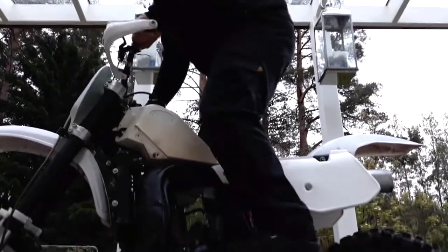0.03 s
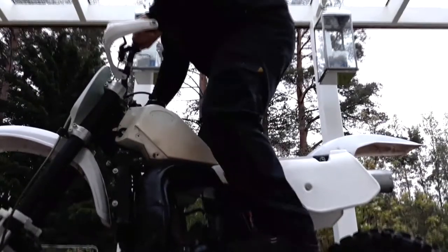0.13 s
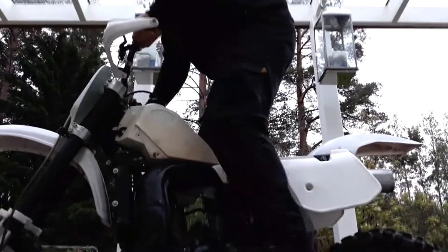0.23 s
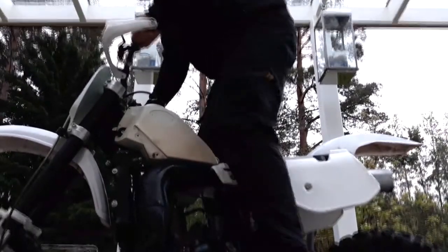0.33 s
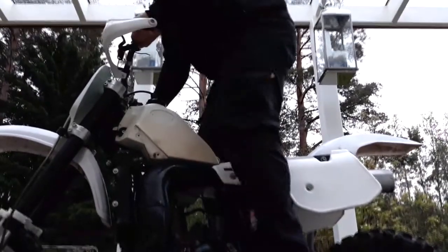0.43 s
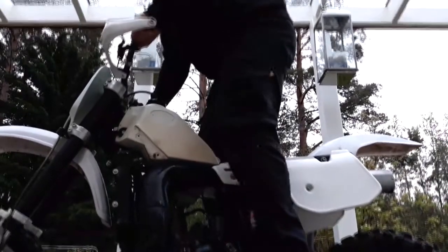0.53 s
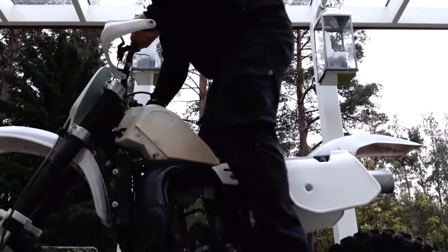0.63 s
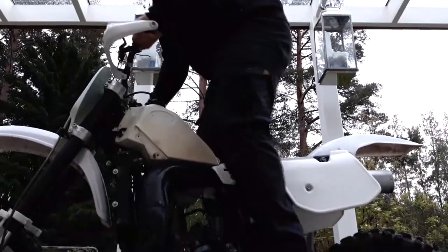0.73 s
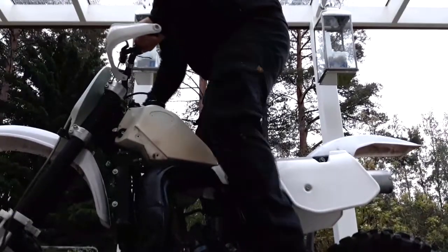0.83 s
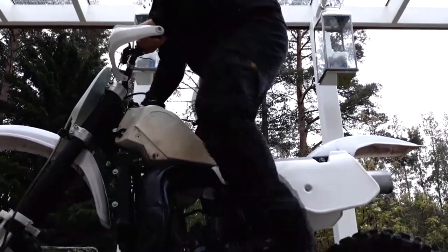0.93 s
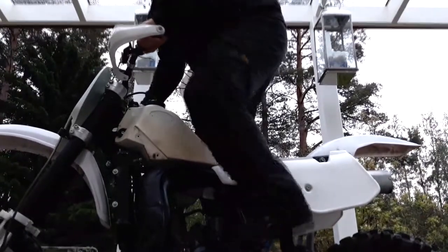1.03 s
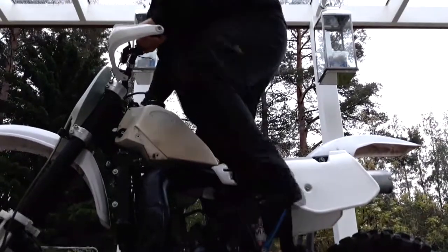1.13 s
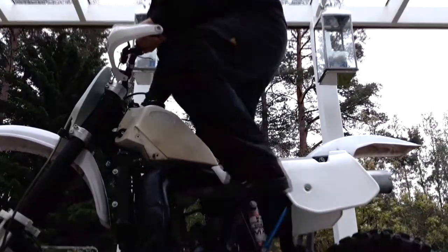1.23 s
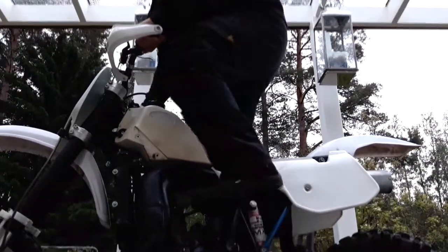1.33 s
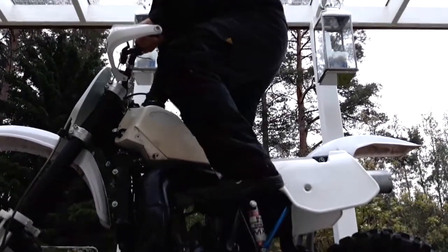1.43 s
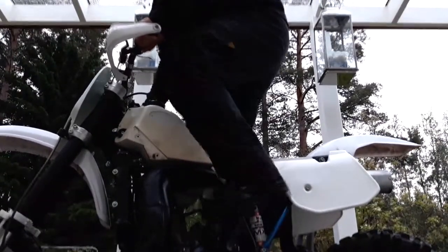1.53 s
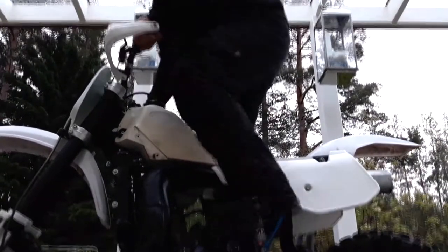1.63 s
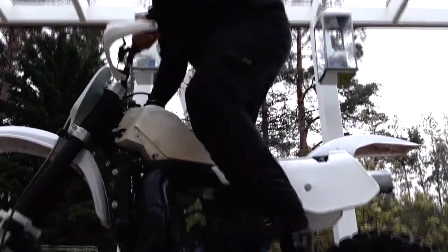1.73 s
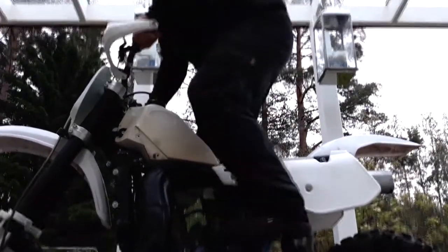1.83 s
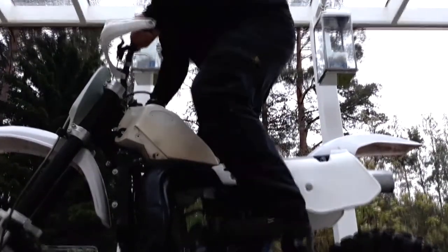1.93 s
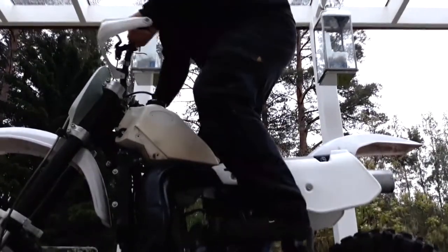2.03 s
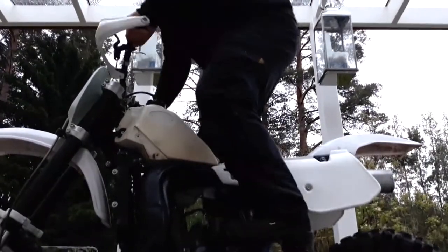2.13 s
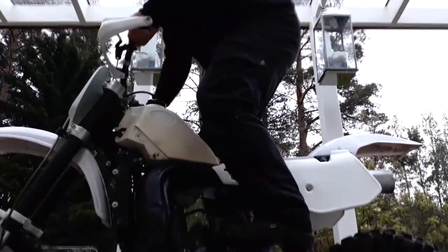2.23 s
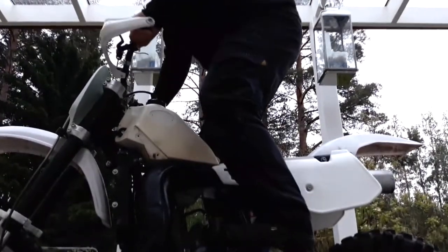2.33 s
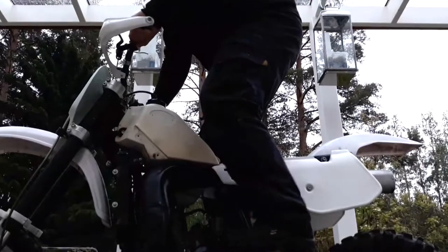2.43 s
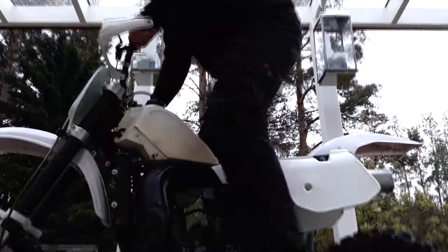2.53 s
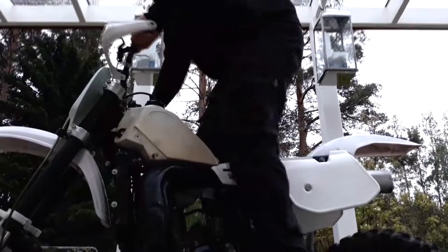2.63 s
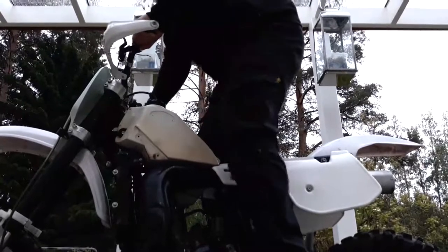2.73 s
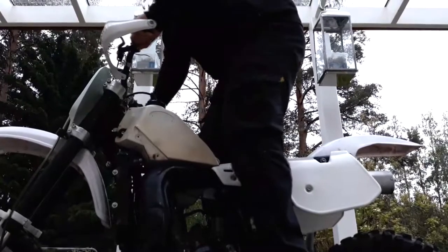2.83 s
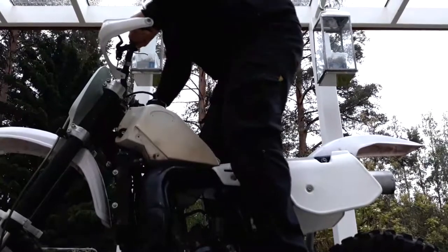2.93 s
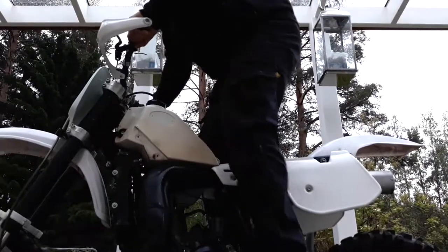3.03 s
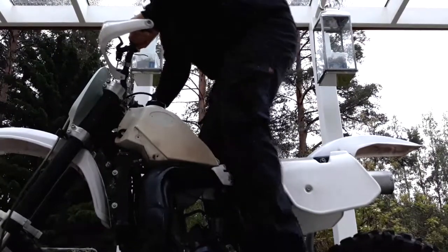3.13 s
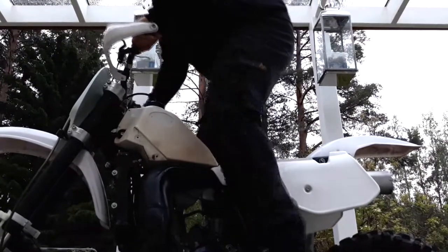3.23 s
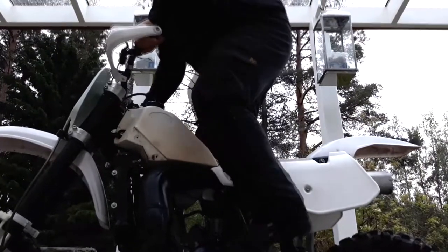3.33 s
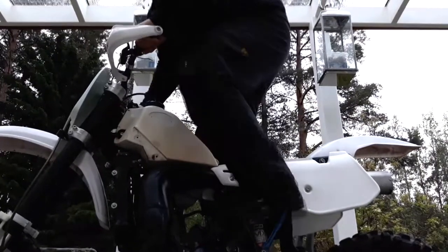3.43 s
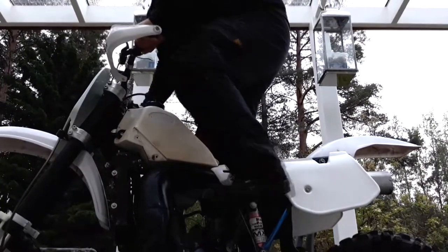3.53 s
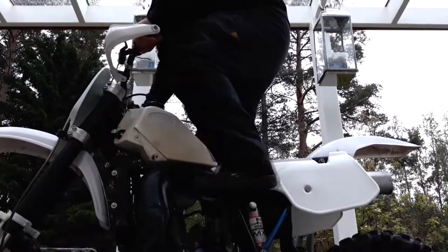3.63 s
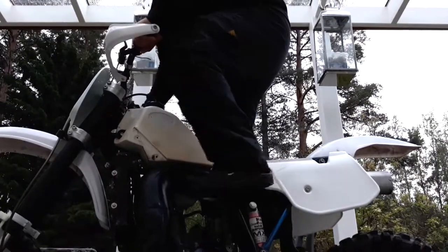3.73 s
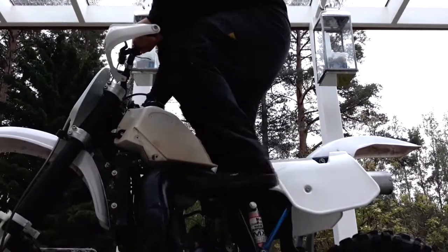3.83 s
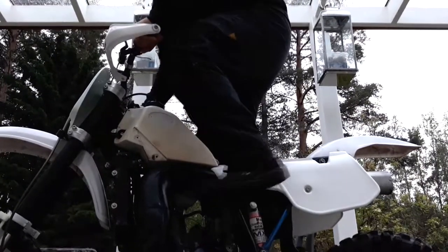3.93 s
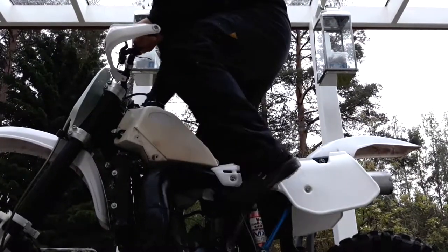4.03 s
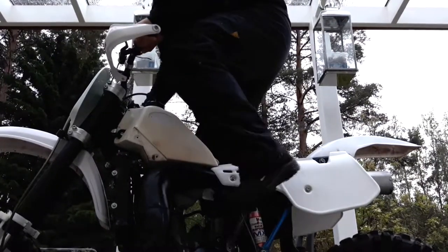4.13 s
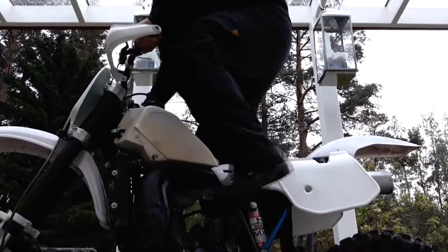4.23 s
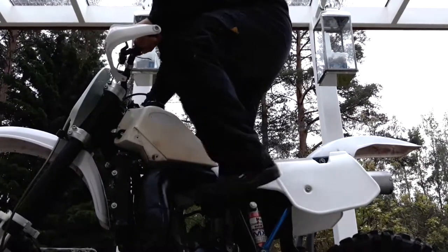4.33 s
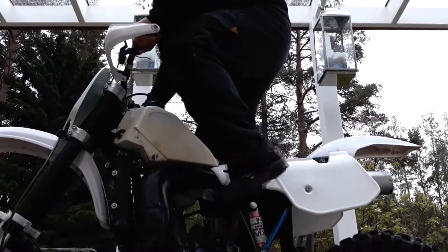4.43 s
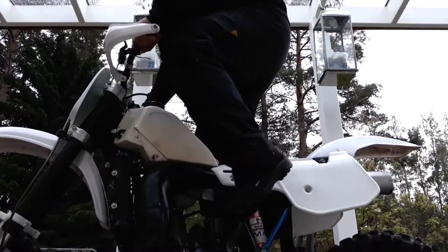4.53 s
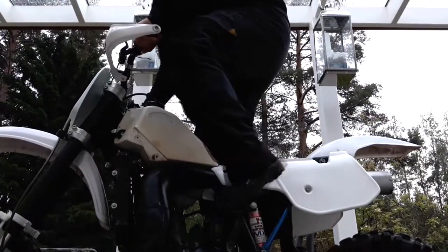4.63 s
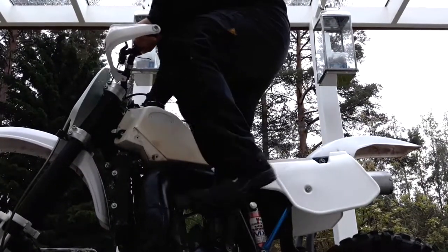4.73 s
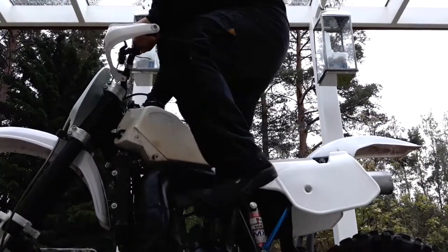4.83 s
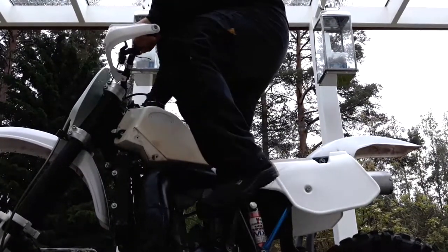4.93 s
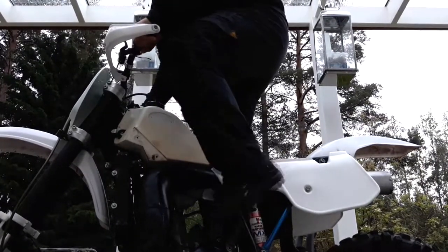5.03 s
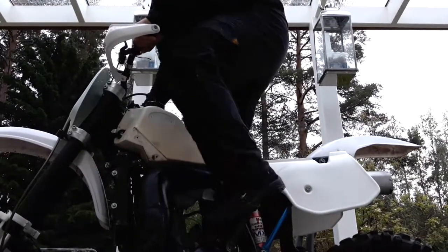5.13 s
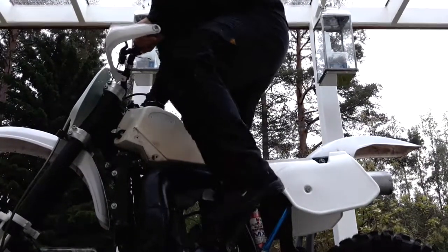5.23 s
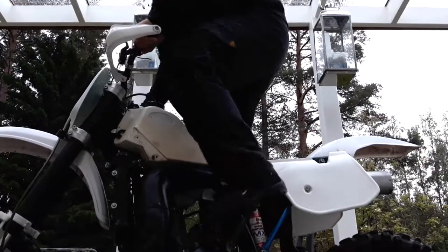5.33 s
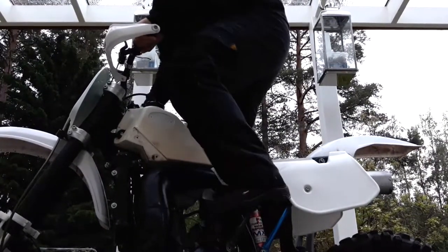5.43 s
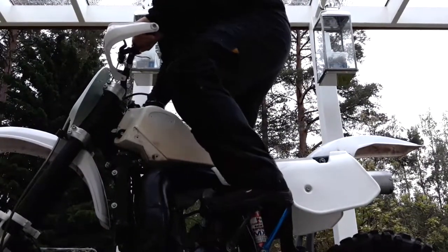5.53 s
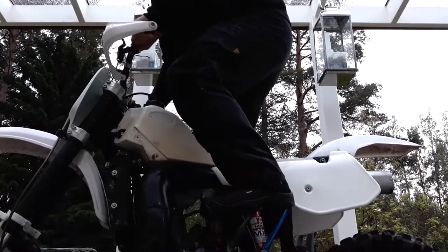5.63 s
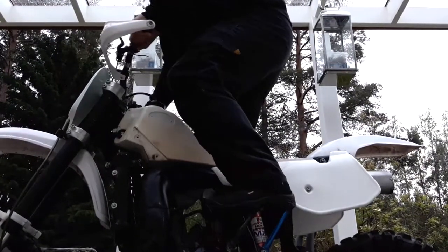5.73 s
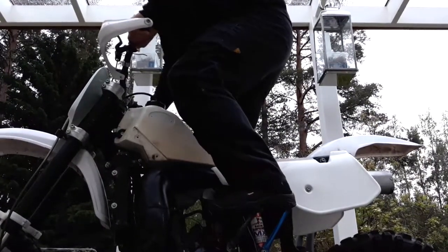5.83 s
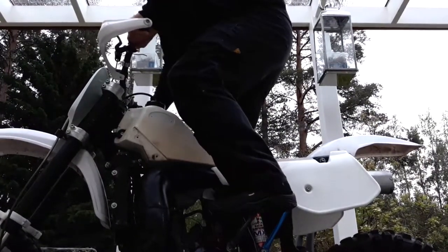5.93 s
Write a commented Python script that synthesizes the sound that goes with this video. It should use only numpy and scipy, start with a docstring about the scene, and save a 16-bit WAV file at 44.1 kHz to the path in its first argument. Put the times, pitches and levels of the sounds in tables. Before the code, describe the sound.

Motorbike kick-start attempts heard close up in a small covered outdoor space with short reflections. Two forceful strokes, with a feeble one between, combine low pipe thumps, grainy gear grinding and breathy hiss. Bright ratchet clacks ring after them, dull rubbery knocks fill gaps, and faint traffic, trees and clothing rustle sit behind.

```python
"""Kick-starting a motorbike under a porch

A rider kicks over a cold single-cylinder motorbike under a porch roof, heard at one microphone. The piston chuffs
through the pipe as ringing notes and turbulence, gears grind as grainy noise, air hisses out of the cylinder through
a narrow path. The starter ratchet clacks in steel resonances as the lever returns, and the lever knocks dully on its
stop. Roof and walls answer; far traffic, trees and boots stay faint behind."""
import sys
import numpy as np
from scipy import signal
from scipy.fft import rfft, irfft, next_fast_len
from scipy.io import wavfile
from scipy.ndimage import uniform_filter1d, map_coordinates

SR = 44100
rng = np.random.default_rng(int(sys.argv[2]) if len(sys.argv) > 2 else 0)


def bounce(signal):
    """Save signal as a 16-bit WAV file at the path given by the first command-line argument."""
    frames = np.transpose(np.atleast_2d(signal))
    limited = np.clip(frames, -1, 1)
    pcm = np.round(limited * 32767).astype(np.int16)
    wavfile.write(sys.argv[1], SR, pcm)


def linear_from_db(decibels):
    """Turn decibels (scalar or array-like) into linear amplitude factors; 0 gives 1."""
    return 10 ** (np.asarray(decibels, float) / 20)


N = 263277
T = np.arange(SR * 2 // 5) / SR  # time within one short sound, s

# Far rumble and near rustle, apart from the shudder: [t/s, rumble level/dB, rustle level/dB]
BACKGROUND_LEVELS = [(0, -48.5, -52.5), (.2, -53.5, -55), (.95, -61, -60.5), (1.2, -61.5, -62),
                     (1.45, -68, -66.5), (1.95, -59.5, -74.5), (2.25, -66.5, -70), (2.45, -59.5, -65),
                     (3.1, -58, -60.5), (3.55, -54.5, -52), (3.7, -53.5, -61.5), (3.85, -65.5, -68),
                     (4.15, -55, -55), (4.35, -51.5, -61), (4.6, -61, -57.5), (4.8, -57.5, -60),
                     (5, -61.5, -69.5), (5.17, -51.5, -51.5), (5.4, -64, -64), (5.97, -58.5, -53.5)]
# Spectrum of the far traffic: [f/Hz, relative density/dB]
RUMBLE_SPECTRUM = [(20, 4), (45, 10.5), (70, -8), (80, -2), (98, -1.5), (125, -6.5), (200, -11),
                   (400, -52.5)]
# Spectrum of boots and cloth close by: [f/Hz, relative density/dB]
RUSTLE_SPECTRUM = [(100, -33), (250, 6.5), (500, 6), (1000, 2.5), (2000, -11), (2700, -18), (5000, -40.5)]
# Spectrum of the trees: [f/Hz, relative density/dB]
HISS_SPECTRUM = [(800, -10.5), (2000, -6), (2800, -8.5), (4300, -3.5), (6000, -13), (8700, -17),
                 (9300, -33), (16000, -23.5)]
# Each kick: [t/s, intake level/dB with the gears at -27.5 dB, intake dB per dB of gears, shudder peak/dB]
KICKS = [(.3, -29.5, 1.95, -38.5), (1.66, -64, .6, -42.5), (2.561, -26, 1.8, -34)]
# Starter gears before any throb, one list for each kick: [t/s, level/dB]
GRIND_LEVELS = [
    [(0.282, -31), (0.298, -24), (0.41, -39.5), (0.438, -47.5), (0.444, -35.5), (0.52, -63)],
    [(1.58, -42), (1.586, -28.5), (1.596, -40), (1.674, -56), (1.72, -73)],
    [(2.525, -33), (2.529, -26.5), (2.565, -30), (2.607, -30.5), (2.663, -49.5), (2.683, -41.5),
     (2.891, -63.5), (2.9, -47.5)],
]
# Spectrum of the chattering teeth: [f/Hz, relative density/dB]
GEAR_SPECTRUM = [(350, -27), (600, -11), (670, -13.5), (1180, -11.5), (1470, -10), (2040, -11.5),
                 (2210, -3.5), (2650, -15), (4280, -10), (5630, -19), (16000, -52)]
# Spectrum of the air rushing into the intake: [f/Hz, relative density/dB]
INTAKE_SPECTRUM = [(3000, -23.5), (5200, 1.5), (7100, 3.5), (10000, -7), (16000, -6)]
# The pawl scraping into mesh before the stroke: [t/s, rms level/dB, length/s]
SCRAPES = [(0.256, -27.5, 0.033), (2.4986, -31, 0.079)]
# Resonances of the scraping pawl: [f/Hz, width/Hz, relative level/dB]
PAWL_MODES = [(890, 190, -0.5), (1278, 40, -12), (2320, 140, -13.5), (4510, 130, -35), (5180, 140, -35)]
# Low pulses, from gas in the pipe or the frame flexing under the boot: [t/s, rms level/dB, t60/s, note f/Hz]
CHUFFS = [(0.279, -10, 0.072, 246.6), (0.294, -9.5, 0.14, 115), (0.313, -14.5, 0.11, 232.4),
          (0.386, -29, 0.11, 260.5), (0.408, -13, 0.03, 224), (1.585, -41.5, 0.24, 92.7),
          (1.63, -34.5, 0.14, 238), (1.65, -35.5, 0.13, 147), (1.736, -34, 0.16, 257),
          (1.762, -28.5, 0.091, 520), (2.524, -8, 0.12, 236.6), (2.535, -14.5, 0.34, 115),
          (2.565, -17, 0.092, 359), (2.594, -25.5, 0.27, 288.4), (4.067, -43, 0.18, 92.6),
          (4.719, -51.5, 0.21, 147), (5.091, -40.5, 0.18, 99), (5.55, -50, 0.18, 320),
          (5.94, -48.5, 0.16, 503)]
# Resonances of the pipe: [f/Hz, width/Hz, relative level/dB]
PIPE_MODES = [(115, 75, 5.5), (266, 180, 2.5), (363, 35, 4.5), (575, 70, -8), (675, 49, -8),
              (750, 110, -3.5), (1210, 96, -31.5)]
# Ratchet and lever clacks: [t/s, snap peak/dB, struck f/Hz, thud/dB and rattle/dB relative to the snap]
CLACKS = [(0.286, -14.5, 5180, -1.5, -23.5), (0.2968, -15.5, 1210, 0, -15.5),
          (0.364, -19.5, 2150, -10.5, -11.5), (0.4255, -31.5, 2610, -2.5, -4),
          (0.4432, -21.5, 2550, -40, -16), (0.6608, -34, 3070, -25, -19), (0.8009, -40.5, 2180, -13, -21.5),
          (1.076, -30, 2220, -30, -8), (1.12, 0.5, 2470, -37.5, -24), (1.22, 0, 2456, -37, -17),
          (1.5258, -37.5, 2214, -27, -12.5), (1.5854, -18.5, 4300, -21.5, -13),
          (1.951, -33.5, 4220, -24.5, -18), (1.958, -31.5, 3660, -33, -13.5),
          (2.528, -10.5, 7040, -9.5, -21), (2.539, -18.5, 1335, 0, -18), (2.589, -14.5, 2150, -12.5, -20.5),
          (2.6075, -11, 4160, -38, -11), (2.702, -25.5, 4300, -36, -11), (2.8964, -43.5, 1980, -25, -7),
          (2.947, -44, 1200, -32, -3), (3.1298, -42.5, 1296, -6.5, -7.5), (3.2904, -19, 1260, -21.5, -13),
          (3.303, -21.5, 4300, -25, -13.5), (3.3857, -7, 3730, -34.5, -14), (3.472, -3.5, 4700, -34, -13.5),
          (3.5608, -1, 2500, -33, -16), (3.6414, -26.5, 2090, -17.5, -10), (3.9629, -39, 2103, -10, -19),
          (4.0107, -17, 2190, -35, -22.5), (4.0633, -28, 4300, -27, -7), (4.0674, -16.5, 3000, -24.5, -18),
          (4.2159, -26, 2560, -23, -18), (4.2726, -34, 2250, -16.5, -18), (4.3045, -29, 1530, -23, -14),
          (4.4276, -34, 2160, -29, -20.5), (4.4382, -35, 2480, -39, -24), (4.524, -34, 4360, -26, -1),
          (4.5279, -28.5, 2470, -7, -10.5), (4.6438, -24.5, 3718, -25.5, -12.5),
          (5.0815, -34, 2380, -5.5, 0), (5.0837, -19, 5570, -38, -12)]
# The blow itself: [f/Hz, width/Hz, relative level/dB]
SNAP_MODES = [(1540, 100, -10.5), (2600, 630, -5), (3480, 240, -14.5), (4704, 580, -10)]
# Lever and cases: [f/Hz, width/Hz, mean relative level/dB]
STEEL_MODES = [(1046, 530, -6.5), (1504, 250, -2.5), (2130, 400, -5), (2480, 240, -1.5), (2950, 380, -7),
               (3757, 150, -3.5), (4300, 140, -0.5), (5170, 380, -9.5), (5627, 430, -12.5),
               (6310, 380, -18.5), (6900, 200, -15), (8120, 630, -18.5)]
# Thud of the frame: [f/Hz, width/Hz, relative level/dB]
FRAME_MODES = [(320, 210, 3), (585, 170, 5.5), (926, 960, -4)]
# Air leaking under compression: [t/s, rms level/dB, rise/s, t60/s, tilt/dB per octave]
LEAKS = [(0.523, -41, 0.032, 0.14, -1), (1.728, -38.5, .04, 0.14, -1.5), (2.672, -38.5, 0.016, 0.27, -2.5)]
# Resonances of the leak's narrow path before tilt: [f/Hz, width/Hz, relative level/dB]
VENT_MODES = [(2450, 140, 0.5), (3590, 530, -4), (5030, 290, -1), (6175, 180, -4.5), (6850, 180, -2),
              (8100, 850, -16), (11950, 500, -21.5)]
# Dull knocks of the lever on its rubber stop: [t/s, strength/dB]
KNOCKS = [(0.699, -21), (0.889, -26.5), (2.008, -25), (2.162, -31), (2.308, -42), (2.372, -38.5),
          (2.911, -17.5), (3.055, -35), (3.08, -30), (4.957, -40.5), (5.41, -43), (5.493, -41),
          (5.704, -43)]
# Low modes of the lever on its stop: [f/Hz, width/Hz, relative level/dB]
STOP_MODES = [(518.5, 110, -3.5), (770, 150, 1.5), (1000, 280, -3.5), (1200, 180, -2.5), (1490, 200, -5),
              (1980, 230, -5)]
# Decay of the porch: [f/Hz, t60/s]
PORCH_DECAY = [(200, 0.42), (600, 0.32), (1500, 0.26), (4000, 0.22), (10000, 0.19)]

SHUDDER_RISE_S, SHUDDER_DB_PER_S, SHUDDER_RUMBLE_DB = .1, 103, -6  # rise, fall, its share in the rumble
HISS_DB, HISS_PER_DB = -62.5, 0.3068  # hiss at a rustle of -62 dB, and how it follows the rustle
THROB_S, THROB_GROWS_S, THROB_PEAK_S, THROB_HZ, THROB_DB = 2.68, .1, 2.77, 43.4, 10
CHUFF_RISE_S, CHUFF_SLOWER = .003, 0.088  # rise at 0 dB; dB of rise per dB softer
NOTE_SHARE = 0.52  # share of the note in a chuff's power, 0-1
TOUCH_S, TOUCH_DB = 0.0035, -22.5  # first touch: lead, strength under the blow
# treble before each layer's own trim, at 0 dB and 2.5 kHz; harder, higher and looser blows are brighter
TREBLE_DB, TREBLE_PER_DB, TREBLE_PER_OCTAVE_DB, TREBLE_PER_RATTLE_DB = -0.5, 0.5, 6, 0.84
STRUCK_WIDTH, STRUCK_DB = .3, -1  # struck spot in the snap: width over pitch, level
KNOCK_T60_S, KNOCK_LONGER = 0.023, 0.6  # t60 at 0 dB; dB of t60 per dB softer


def unit(x):
    """Scaled to rms 1."""
    return x / np.sqrt(np.mean(x ** 2) + 1e-20)


def along(points, hz):
    """(Hz, value) points read on a log frequency axis."""
    f, v = np.transpose(points)
    return np.interp(np.log(hz + 1), np.log(f + 1), v)


def filtered(x, response):
    """x times a complex response of frequency."""
    m = next_fast_len(len(x) + 8192)
    return irfft(rfft(x, m) * response(np.fft.rfftfreq(m, 1 / SR)), m)[:len(x)]


def resonant(x, peaks, low_hz, high_hz):
    """x through causal resonances of alternating sign, with skirts of 12 dB an octave outside low-high."""
    def response(f):
        modes = 0
        for k, (centre, width, db) in enumerate(peaks):
            damping = 1j * f * width
            modes = modes + (-1) ** k * linear_from_db(db) * damping / (centre * centre - f * f + damping)
        skirts = (1j * f / (low_hz + 1j * f) * high_hz / (high_hz + 1j * f)) ** 2
        return modes * skirts
    return filtered(x, response)


def coloured(spectrum, patchy_db):
    """Noise of rms 1 with patches of random gain in time and frequency."""
    z = signal.stft(rng.standard_normal(N), nperseg=512)[2]
    field = uniform_filter1d(rng.standard_normal(z.shape), size=5, axis=0)
    field = uniform_filter1d(field, size=10, axis=1)
    patchy = signal.istft(z * linear_from_db(patchy_db * unit(field)), nperseg=512)[1][:N]
    return unit(filtered(patchy, lambda hz: linear_from_db(along(spectrum, hz))))


def grains(count, depth_db):
    """Noise broken into uneven grains of about 2 ms."""
    chatter = map_coordinates(rng.standard_normal(count // 80 + 4), [np.arange(count) / 80])
    return linear_from_db(depth_db * chatter) * rng.standard_normal(count)


def swell(rise, t60):
    """Envelope of peak near 1: a smooth rise, then decay."""
    return np.sin(np.pi / 2 * np.clip(T / rise, 0, 1)) ** 2 * linear_from_db(-60 * np.maximum(T - rise, 0) / t60)


def add(track, s, sound, wet_db):
    """Places a sound with its own answer from the porch; roof and walls reply after a gap of a few ms."""
    hz, t, z = signal.stft(rng.standard_normal(len(T)), SR, nperseg=256)
    decay = linear_from_db(-60 * t / along(PORCH_DECAY, hz)[:, None])
    tail = signal.istft(z * decay, SR, nperseg=256)[1][:len(T)]
    tail = tail * np.clip((T - .004) / 0.014, 0, 1)
    wet = signal.fftconvolve(sound, tail / np.linalg.norm(tail))
    start = round(s * SR)
    track[start:][:len(sound)] += sound
    track[start:][:len(wet)] += linear_from_db(wet_db) * wet


def background():
    """Far traffic rumble, near rustle of boots and cloth, hiss of trees; bike and rider shudder after each kick."""
    t = np.arange(N) / SR
    times, *levels = np.transpose(BACKGROUND_LEVELS)
    rumble_db, rustle_db = (np.interp(t, times, db) for db in levels)
    shudder = np.zeros(N)
    for s, _, _, peak_db in KICKS:
        fall_db = SHUDDER_DB_PER_S * np.maximum(t - s - SHUDDER_RISE_S, 0)
        shudder += np.clip((t - s) / SHUDDER_RISE_S, 0, 1) * linear_from_db(peak_db - fall_db)
    rumble = linear_from_db(rumble_db) + linear_from_db(SHUDDER_RUMBLE_DB) * shudder
    rustle = linear_from_db(rustle_db) + shudder
    hiss = linear_from_db(HISS_DB) * (rustle / linear_from_db(-62)) ** HISS_PER_DB
    out = rumble * coloured(RUMBLE_SPECTRUM, patchy_db=0.5)
    out += rustle * coloured(RUSTLE_SPECTRUM, patchy_db=3.5)
    return out + hiss * coloured(HISS_SPECTRUM, patchy_db=0.5)


def gears():
    """Teeth chatter in uneven grains and the intake rushes as the crank spins; the pawl first scrapes into mesh."""
    t = np.arange(N) / SR
    teeth_level, intake_level = np.zeros((2, N))
    for stroke, (_, intake_db, wider, _) in zip(GRIND_LEVELS, KICKS):
        gears_db = np.interp(t, *np.transpose(stroke), -120, -120)
        teeth_level += linear_from_db(gears_db)
        intake_level += linear_from_db(intake_db + wider * (gears_db + 27.5))
    teeth = unit(filtered(grains(count=N, depth_db=2.5), lambda hz: linear_from_db(along(GEAR_SPECTRUM, hz))))
    turning = teeth_level * teeth + intake_level * coloured(INTAKE_SPECTRUM, patchy_db=4.5)
    # the crank throbs late in the third kick
    throb = np.clip((t - THROB_S) / THROB_GROWS_S, 0, 1) * np.cos(2 * np.pi * THROB_HZ * (t - THROB_PEAK_S))
    out = np.pad(linear_from_db(THROB_DB * throb) * turning, (0, SR))
    for s, db, length in SCRAPES:
        shape = np.clip(T / 0.0011, 0, 1) * linear_from_db(-60 * np.maximum(T - length, 0) / 0.026)
        scrape = unit(resonant(rng.standard_normal(len(T)), PAWL_MODES, 420, 3300))
        add(out, s, linear_from_db(db) * shape * scrape, wet_db=-15.0)
    return out[:N]


def chuffs():
    """Each pulse rings one unsteady note and blows turbulence through all the pipe's resonances."""
    out = np.zeros(N + SR)
    for s, db, t60, hz in CHUFFS:
        drift = .008 * np.cumsum(rng.standard_normal(len(T)))  # wandering phase, radians
        note = -np.sqrt(2) * np.sin(2 * np.pi * hz * T + drift)
        gas = unit(resonant(rng.standard_normal(len(T)), PIPE_MODES, 67, 1800))
        pulse = np.sqrt(NOTE_SHARE) * note + np.sqrt(1 - NOTE_SHARE) * gas
        shape = swell(CHUFF_RISE_S * linear_from_db(-CHUFF_SLOWER * db), t60)  # softer ones rise slower
        add(out, s, linear_from_db(db) * shape * pulse, wet_db=-15.0)
    return out[:N]


def clacks():
    """Steel on steel: a light first touch, a short snap, loose parts that rattle on, a thud in the frame."""
    out = np.zeros(N + SR)
    loosen = .6 * swell(.012, .12) + .4 * swell(.002, .15)
    lead = round(TOUCH_S * SR)
    for s, db, hz, thud_db, rattle_db in CLACKS:
        treble_db = TREBLE_DB + TREBLE_PER_DB * db + TREBLE_PER_RATTLE_DB * rattle_db
        treble_db += TREBLE_PER_OCTAVE_DB * np.log2(hz / 2500)
        blow = (np.exp(-T / .0001) + .5 * rng.standard_normal(len(T))) * linear_from_db(-60 * T / .012)
        struck = [(hz, STRUCK_WIDTH * hz, STRUCK_DB), (8000, 4000, treble_db - 3.0)]
        snap = resonant(blow, SNAP_MODES + struck, 690, 12000)
        loose = grains(count=len(T), depth_db=2.5)
        modes = [(c, w, level + rng.normal(0, 1.5)) for c, w, level in STEEL_MODES]  # no two hits ring alike
        rattle = unit(resonant(loose, modes, 750, 16000))
        rattle += linear_from_db(treble_db - 1.5) * unit(resonant(loose, [(10500, 4700, 0)], 6500, 27000))
        thud = unit(resonant(rng.standard_normal(len(T)), FRAME_MODES, 210, 1800)) * swell(0.0013, 0.24)
        hit = snap / np.abs(snap).max() + linear_from_db(rattle_db) * rattle * loosen + linear_from_db(thud_db) * thud
        touch = linear_from_db(db + TOUCH_DB) * np.pad(hit, (0, lead))
        add(out, s - lead / SR, touch + linear_from_db(db) * np.pad(hit, (lead, 0)), wet_db=-11.0)
    return out[:N]


def leaks():
    """Escaping air hisses through the resonances of its narrow path, tilted anew for each leak."""
    out = np.zeros(N + SR)
    for s, db, rise, t60, tilt_db in LEAKS:
        path = [(c, w, level + tilt_db * np.log2(c / 4000)) for c, w, level in VENT_MODES]
        air = unit(resonant(rng.standard_normal(len(T)), path, 2500, 12000))
        add(out, s, linear_from_db(db) * swell(rise, t60) * air, wet_db=-4.5)
    return out[:N]


def knocks():
    """Rubber damps the blow: a short ping, then only the low modes of the lever answer."""
    out = np.zeros(N + SR)
    for s, db in KNOCKS:
        body = unit(resonant(grains(count=len(T), depth_db=1.0), STOP_MODES, 350, 1900))
        body *= swell(0.0022, KNOCK_T60_S * linear_from_db(-KNOCK_LONGER * db))  # soft ones linger
        ping = linear_from_db(7.5 - 60 * T / 0.0046) * np.sin(2 * np.pi * 1950 * T)
        add(out, s, linear_from_db(db - 15.0) * (body + ping), wet_db=-6.5)
    return out[:N]


def scene():
    """All sources, near and far, at one microphone."""
    return (background() + gears() + chuffs() + clacks() + leaks() + knocks())[None]


def band_limit(x):
    """A steep low-pass at the top of the band."""
    return signal.sosfilt(signal.butter(12, 16800, fs=SR, output="sos"), x)


def record(dry):
    """The microphone shelves off deep bass, the loudest blows round off at full scale, the band ends sharply."""
    def shelf(hz):
        return linear_from_db(-29.0) + (-hz * hz / (80 ** 2 - hz * hz + 1j * hz * 60)) ** 2
    x = filtered(dry[0], shelf)
    x = x / (1 + np.abs(x / .99) ** 6) ** (1 / 6)
    mix = filtered(x, lambda hz: hz < 15850)[None]
    return band_limit(mix)


dry = scene()
out = record(dry)
bounce(out)
```